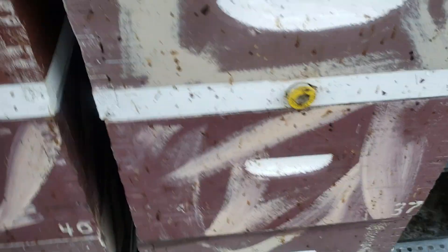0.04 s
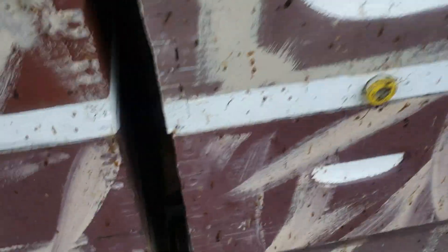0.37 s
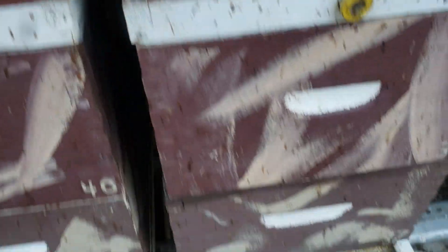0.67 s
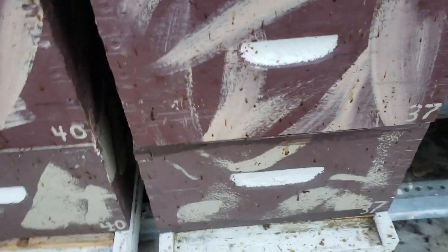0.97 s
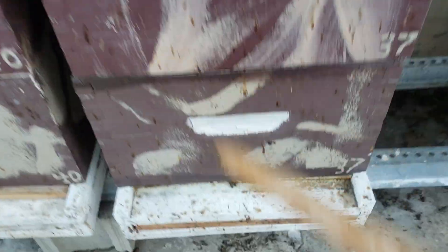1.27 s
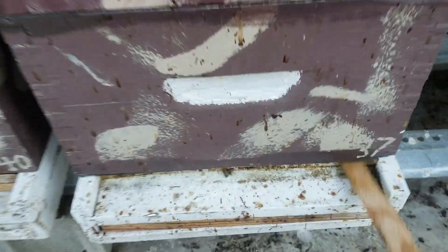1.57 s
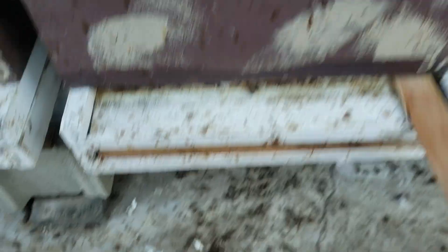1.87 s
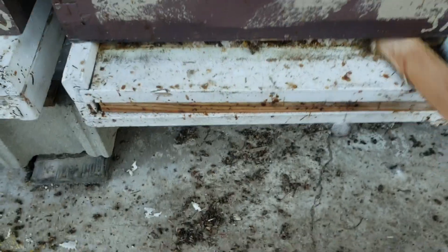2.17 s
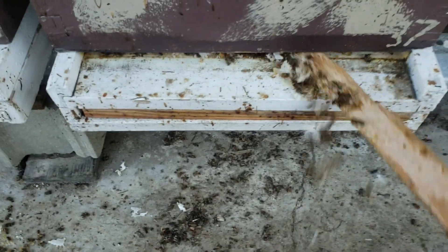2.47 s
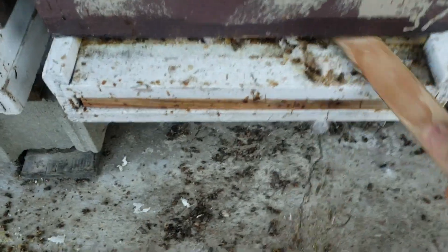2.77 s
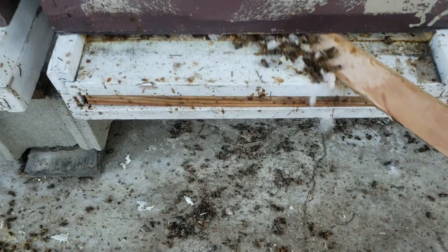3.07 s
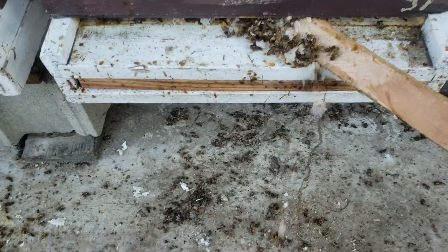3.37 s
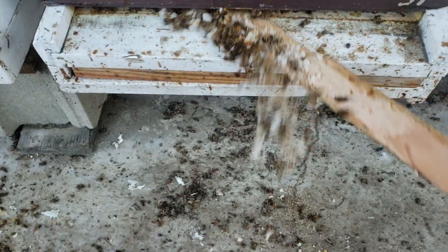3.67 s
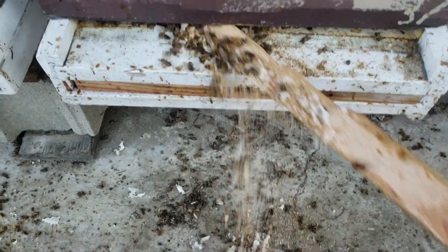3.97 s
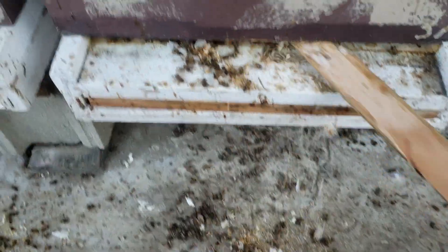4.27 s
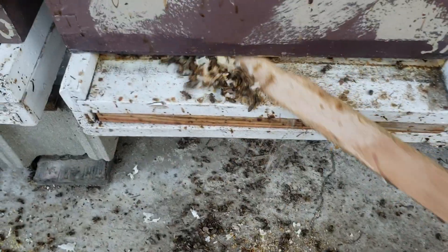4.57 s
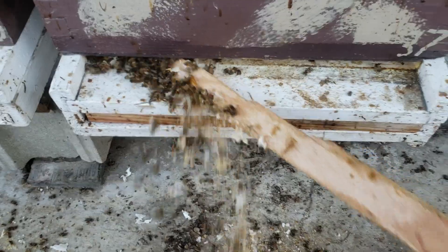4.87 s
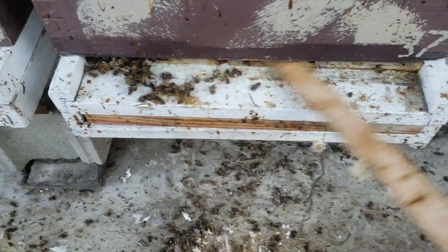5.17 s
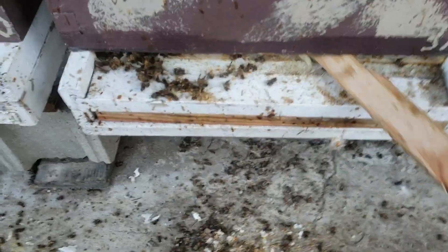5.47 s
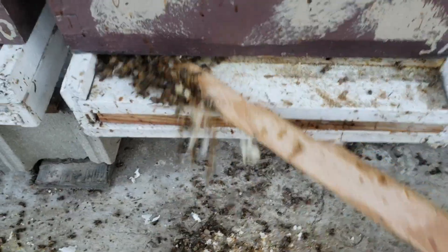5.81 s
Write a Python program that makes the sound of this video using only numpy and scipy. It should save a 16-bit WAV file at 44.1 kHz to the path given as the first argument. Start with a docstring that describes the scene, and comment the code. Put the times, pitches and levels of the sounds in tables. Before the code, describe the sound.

After a few gritty steps, a stick knocks and repeatedly scrapes a wooden hive board outdoors, crunching dry crumbs that patter down.

```python
"""Against a quiet outdoor background, someone steps up to a beehive over gritty concrete.
At 1.5 seconds a wooden stick taps the bottom board, then scrapes dry debris off it until the end.
The dragging tip crushes crumbs in a dense crackle and shakes the board, which rings with low wooden
tones. From 3.7 seconds on, loose crumbs patter down. A handheld stereo microphone is close by."""
import sys
import numpy as np
from scipy import signal
from scipy.fft import rfft, irfft, next_fast_len
from scipy.io import wavfile
from scipy.ndimage import uniform_filter1d, map_coordinates

SR = 44100
rng = np.random.default_rng(int(sys.argv[2]) if len(sys.argv) > 2 else 0)


def persist_wave(psi):
    """Save psi, clipped to +-1, as 16-bit WAV."""
    counts = np.round(np.clip(psi, -1, 1) * 32767).astype(np.int16)
    wavfile.write(sys.argv[1], SR, np.atleast_2d(counts).T)


N = 266540

# Tone colours. Each row: frequency in Hz, level there in dB.
AIR_TONE = [(15, -16), (25, -8.5), (149, -4), (190, -7.5), (344, -8.5), (734, -7.5), (1400, -26),
            (3430, -21.5), (16000, -31)]
GRIT_TONE = [(1000, -18), (2500, -13.5), (3300, 0), (4700, 1.5), (6000, -5), (7200, -8), (8300, -22.5),
             (12000, -10), (16000, -14)]
SOLE_TONE = [(300, -21.5), (700, -8.5), (1300, -3), (2200, 1), (3100, 2.5), (4300, 2), (8000, -31.5)]
THUD_TONE = [(30, -29), (65, -3), (100, 2.5), (150, -4), (220, -6), (400, -9.5), (750, -24), (1300, -13.5),
             (4000, -65)]
PATTER_TONE = [(500, -20), (1800, -3), (4000, -11), (6500, 1), (8300, -15), (12000, 1), (16000, 1)]
CLICK_TONE = [(500, -38), (1500, -18), (3300, 3), (6000, -4.5), (8300, -14.5), (12500, -2), (16000, 0)]  # dry wood on wood
HIVE_TONE = [(30, -53), (70, -20), (96, 4), (132, -10), (205, -2.5), (250, -0.5), (310, 0), (350, 0),
             (396, 5), (460, -4.5), (900, -34)]  # the deep box, strongest near 96 and 396 Hz
DUST_TONE = [(5000, -31), (8300, -17.5), (10200, -4), (12200, -2.5), (15800, -3.5)]
CRUMB_TONE = [(300, -24.5), (1000, -2), (2200, -1.5), (3000, 5), (4700, 6.5), (5500, 3.5), (6900, 5),
              (8200, -11.5), (10000, -36), (16000, -46)]
# Modes, the tones at which a thing rings. Each row: pitch in Hz, width in Hz, level in dB.
STICK_MODES = [(2660, 570, -7), (3580, 340, 3), (5670, 190, 9.5), (6350, 210, 5), (7040, 390, 2),
               (9270, 720, -2.5), (12800, 2600, -7.5)]
BOARD_MODES = [(552.4, 36.6, 0.5), (680, 39, -2.5), (766, 74, 0), (1083, 370, -9.5), (1454, 200, -5.5),
               (1693, 89, -2), (2570, 620, -8.5)]
LIP_MODES = [(2960, 94, -4), (3410, 210, -8), (3623, 26, -2), (4370, 100, -13), (4743, 150, -5),
             (5520, 210, -6)]  # the board's thin front edge
# The yard's echo. Each row: frequency in Hz, seconds to fade by 60 dB.
YARD_DECAY = [(100, 0.15), (1000, 0.048), (15000, 0.073)]
# Stereo width. Each row: frequency in Hz, gain in dB of what differs between the sides.
STEREO_WIDTH = [(40, 1), (100, -13), (450, -8), (800, -5), (1100, 1.5), (4000, -0.5), (8500, 1)]
# Stereo balance. Each row: frequency in Hz, gain of left over right in dB.
LEFT_LEAN = [(60, 1), (300, 1.7), (1000, 3), (3000, 4.6), (4600, 4.4), (6300, .5), (7700, 3), (10500, 2.6),
             (13000, -.5)]
# Soles scuffing. Each row: start, length and rise time in seconds, then grit, sole and weight in dB.
SCUFFS = [(0.201, 0.06, .003, -47.5, -63, -49), (0.489, 0.077, 0.015, -43.5, -48.5, -47.5),
          (0.596, 0.91, 0.017, -56.5, -59, -66), (0.685, .055, 0.025, -45.5, -52, -58),
          (1.026, 0.043, 0.042, -33, -45, -90), (1.11, 0.038, 0.012, -52, -54, -81),
          (1.254, 0.072, 0.0074, -45, -34.5, -65)]
# Heels landing. Each row: start in seconds, level in dB, hollow clop and thud in dB relative to that,
# base fade time in seconds.
HEELS = [(0.0166, -21.5, -8, -12, 0.12), (0.203, -47, -29, -12, 0.055), (0.5018, -34.5, -15.5, -25, 0.098),
         (0.7331, -26.5, -15, -11.5, 0.029), (0.8063, -18.5, -15.5, -12.5, 0.061)]
# Crumbs spilling. Each row: start in seconds, length in seconds, level in dB.
SPILLS = [(3.727, 0.365, -48), (4.5, 0.527, -46), (5.02, 0.25, -51.5)]
# Squeaks and groans. Each row: loudest moment in seconds, level in dB, pitch in Hz, half length in seconds.
SQUEAKS = [(0.264, -47.5, 5320, 0.024), (0.929, -51.5, 3500, 0.014), (1.075, -28.5, 3560, 0.0094),
           (1.076, -29, 4660, 0.0049), (1.283, -39.5, 2970, 0.03), (1.94, -29.5, 4700, 0.02),
           (2.796, -28, 5900, 0.0083), (2.868, -25, 4050, 0.0074), (2.887, -44, 97.5, 0.024),
           (2.885, -31.5, 265, 0.0085), (4.555, -35, 225, 0.0065), (3.982, -37.5, 545, 0.024),
           (4.38, -30, 560, 0.008), (5.114, -46.5, 1640, 0.039), (5.605, -43.5, 1610, 0.018),
           (5.719, -46, 2930, 0.014), (5.769, -26.5, 4710, 0.031)]
# Crumbs snapping and the stick's tip striking. Each row: start in seconds, peak level in dB.
SNAPS = [(1.651, -15.5), (1.7377, -25), (1.7485, -15.5), (1.777, -21.5), (2.658, -21), (2.788, -24),
         (3.0344, -21.5), (3.3059, -26), (3.361, -28.5), (3.776, -24), (3.826, -17), (4.7733, -14.5),
         (4.783, -25.5), (4.987, -18), (5.173, -28), (5.241, -32), (5.681, -17.5), (5.7735, -18.5),
         (5.796, -18)]
TAPS = [(1.5182, -9)]
# The stick knocking. Each row: start in seconds, board peak in dB, click and thump in dB relative to that.
KNOCKS = [(1.516, -31, 4, -7), (2.874, -28, -1, -2), (3.944, -22.5, 7, -30), (3.9635, -23.5, 9.5, -12.5),
          (4.132, -48, 18, -17), (4.275, -24, 2, -8), (4.377, -27, -11, 0), (4.456, -25.5, -2, -12),
          (4.495, -26, 10, -14), (5.071, -41, 10.5, -25), (5.261, -38, 15.5, -6), (5.652, -27.5, -17, -13)]
# Pushes and pulls of the stick. Each row: start, length, rise time and time to the crest in seconds,
# fall on either side of the crest in dB per second, crest levels of crumb crackle, board rattle,
# dust hiss and hive box judder in dB, rasp pitch in Hz.
STROKES = [ (1.522, 0.29, 0.029, 0.15, 50, -39.5, -62, -38.5, -58, 5130),
           (1.628, 0.38, 0.032, 0.27, 24, -36, -44.5, -46, -49, 4900),
           (2.046, 0.49, 0.033, 0.29, 35.5, -32, -40.5, -39, -43, 4300),
           (2.583, 0.28, 0.034, 0.29, 47, -27.5, -34.5, -34.5, -38.5, 5300),
           (2.882, 0.5, 0.035, 0.051, 33, -34, -39, -39.5, -41.5, 4000),
           (3.442, 0.45, 0.13, 0.17, 37.5, -32, -39.5, -40, -45, 4470),
           (3.916, 0.17, 0.019, 0.042, 92, -40, -39.5, -43.5, -49, 3750),
           (4.105, 0.3, 0.042, 0.071, 13, -37, -41, -43, -47, 4260),
           (4.43, 0.56, 0.021, 0.072, 26.5, -33, -39.5, -41, -43, 4040),
           (4.742, 0.039, .02, 0.028, 60, -32.5, -51, -43, -45, 4370),
           (4.939, 0.032, 0.041, .03, 63, -32, -40, -35, -47, 3580),
           (5.059, 0.096, 0.015, 0.034, 17, -45, -50, -43.5, -59, 4920),
           (5.225, 0.41, 0.034, 0.26, 66.5, -36, -37.5, -38.5, -44, 4040),
           (5.543, 0.056, 0.036, 0.035, 63, -28, -31.5, -35, -33.5, 4900),
           (5.654, .14, 0.046, 0.058, 34, -27, -40.5, -35, -46, 4460),
           (5.793, 0.25, 0.018, 0.022, 47, -36.5, -51, -40.5, -50, 5000), ]

SCUFF_RELEASE_S, STROKE_RELEASE_S = 0.081, 0.2  # time to fade by 60 dB
SPILL_ATTACK_S, SPILL_RELEASE_S = 0.12, 0.13
SHELL_HZ, SHELL_SPREAD_OCTAVES = 4940, 0.3  # the ring of a crumb's shell
DUST_EASING = 0.95  # share of a stroke's fall that the hiss follows: a light touch is hissier
TOP_HZ = 15850


def amp(db):
    """Turn decibels into a gain."""
    return 10 ** (np.asarray(db) / 20)


def unit(x):
    """Scale a stereo sound so that the mean of its two sides has an average (rms) level of 1."""
    return x / np.sqrt(np.mean(x.mean(0) ** 2) + 1e-20)


def peaked(x):
    """Scale a stereo hit so that the mean of its two sides peaks at 1."""
    return x / np.abs(x.mean(0)).max()


def along(points, hz):
    """Read between (Hz, value) points on a logarithmic frequency scale."""
    freqs, values = np.transpose(points)
    return np.interp(np.log(hz + 1), np.log(freqs), values)


def filtered(x, response):
    """Filter x with a function that gives the gain at each frequency."""
    n = x.shape[-1]
    padded = 2 * next_fast_len(n // 2 + 4096)
    return irfft(rfft(x, padded) * response(np.fft.rfftfreq(padded, 1 / SR)), padded)[..., :n]


def colour(points):
    """A filter with the given tone colour that rings after a hit, never before it."""
    def response(hz):
        cepstrum = irfft(np.log(amp(along(points, hz))))
        cepstrum[1:len(hz) - 1] *= 2
        cepstrum[len(hz):] = 0
        return np.exp(rfft(cepstrum))
    return response


def body(modes):
    """A filter that rings like an object with these modes."""
    return lambda f: sum((-1) ** k * amp(db) * 1j * f * width / (hz * hz - f * f + 1j * f * width)
                         for k, (hz, width, db) in enumerate(modes))


def burst(t60, size=8192):
    """One contact: a puff of stereo noise that fades by 60 dB in t60 seconds."""
    return rng.standard_normal((2, size)) * amp(-60 * np.arange(size) / SR / t60)


def add(track, start, sound):
    """Mix a sound into the track at start seconds."""
    part = track[:, max(round(start * SR), 0):][:, :sound.shape[1]]
    part += sound[:, :part.shape[1]]


def wobble(rate):
    """A smooth curve through rate random values a second."""
    return map_coordinates(rng.standard_normal(int(N * rate / SR) + 4), [np.arange(N) * rate / SR])


def steady(x, size=1800):
    """Even out slow swells and keep the fine grain."""
    power = np.mean(np.atleast_2d(x) ** 2, 0)
    return x / np.sqrt(np.abs(uniform_filter1d(uniform_filter1d(power, size), size)) + 1e-12)


def slide(start, length, attack, release, step=1):
    """Gain of one sliding contact, every step samples: it bites, holds and lets go."""
    t = np.arange(0, N, step) / SR - start
    return np.clip(t / attack, 0, 1) ** 2 * amp(-60 * np.clip((t - length) / release, 0, 2))


def slips(rate, spread_db, clump_db, clump_rate):
    """Surfaces stick and slip: about rate tiny kicks a second, uneven in size and swelling in clumps."""
    sizes = amp(spread_db * np.clip(rng.standard_normal(N), -3, 2.6) + clump_db * wobble(clump_rate))
    return steady((rng.random(N) < rate / SR) * sizes)


def scatter(pulses, t60, shared=0.62):
    """Each kick dies as a tiny puff; part of it reaches both sides, by paths of different length."""
    puff = amp(-60 * np.arange(2048) / SR / t60)
    level = np.sqrt(np.abs(signal.oaconvolve(pulses ** 2, puff ** 2)[:N]))
    left, right_only = rng.standard_normal((2, N))
    phases = np.append(0, rng.normal(0, 2.61, size=23))  # the bass arrives in step
    phase_hz = np.linspace(0, SR / 2, len(phases))
    shifted = filtered(left, lambda hz: np.exp(1j * np.interp(hz, phase_hz, phases)))
    right = shared * shifted + np.sqrt(1 - shared ** 2) * right_only
    return level * np.array([left, right])


def air():
    """Quiet outdoor background that drifts a little in level."""
    return amp(-59.0 + 0.25 * wobble(3.0)) * unit(filtered(rng.standard_normal((2, N)), colour(AIR_TONE)))


def yard_echo(x):
    """Sound bounces briefly off the hives and the concrete."""
    hz, t, spectrum = signal.stft(rng.standard_normal((2, SR // 3)), SR, nperseg=256)
    fade = amp(-60 * t / along(YARD_DECAY, hz)[:, None])
    tail = signal.istft(spectrum * fade, SR, nperseg=256)[1]
    return signal.fftconvolve(x, tail / np.linalg.norm(tail[0]), axes=1)[:, :N]


def footsteps():
    """Soles roll and scuff over the grit; heels land on concrete."""
    grit, sole, weight = sum(np.outer(amp(levels_db), slide(start, length, attack, SCUFF_RELEASE_S))
                             for start, length, attack, *levels_db in SCUFFS)
    sand = scatter(slips(rate=4100, spread_db=4.0, clump_db=2.5, clump_rate=97), t60=0.015)
    out = grit * unit(filtered(sand, colour(GRIT_TONE)))
    out += sole * unit(filtered(sand, colour(SOLE_TONE)))
    out += weight * unit(steady(filtered(sand, colour(THUD_TONE))))
    for start, db, clop_db, thud_db, fade in HEELS:
        crunch = peaked(filtered(burst(fade * 0.58), colour(GRIT_TONE)))
        slap = peaked(filtered(burst(fade * 1.63), colour(SOLE_TONE)))
        clop = peaked(filtered(burst(fade * 2.8), body([(498, 145, 0), (820, 230, 0)])))
        thud = peaked(filtered(burst(fade * 2.95), colour(THUD_TONE)))
        add(out, start, amp(db) * (crunch + amp(-3) * slap + amp(clop_db) * clop + amp(thud_db) * thud))
    return out


def spills():
    """Loosened crumbs drop off the edge and patter on the concrete."""
    flow = sum(amp(db) * slide(start, length, SPILL_ATTACK_S, SPILL_RELEASE_S)
               for start, length, db in SPILLS)
    landings = scatter(slips(rate=980, spread_db=8.0, clump_db=9, clump_rate=68), t60=0.011)
    return flow * unit(filtered(landings, colour(PATTER_TONE)))


def squeaks():
    """A sliding contact chatters for a moment around one pitch."""
    out, t = np.zeros((2, N)), np.arange(-SR // 8, SR // 8) / SR
    for crest, db, hz, half_length in SQUEAKS:
        swell = np.exp(-(t / half_length) ** 2)
        mode = body([(hz, 50 + .11 * hz, 0)])
        ring = swell * filtered(rng.standard_normal((2, len(t))), lambda f: mode(f) ** 2)
        add(out, crest + t[0], amp(db) * unit(ring) * np.sqrt(np.mean(swell ** 2)))
    return out


def snaps():
    """Larger crumbs crack, and each one's shell rings at its own pitch."""
    out = np.zeros((2, N))
    for start, db in SNAPS:
        hz = SHELL_HZ * 2 ** rng.normal(0, SHELL_SPREAD_OCTAVES)
        crack = burst(t60=.012) + amp(-14) * burst(t60=.035)
        shell = [(hz * 0.63, 1000, -4), (hz, 1300, 0), (12500, 5000, -15)]
        add(out, start, amp(db) * peaked(filtered(crack, body(shell))))
    return out


def taps():
    """The hard tip meets the board and the stick rings for an instant."""
    out = np.zeros((2, N))
    for start, db in TAPS:
        blow = burst(t60=0.0064) + amp(-10) * burst(t60=0.014)
        add(out, start, amp(db) * peaked(filtered(blow, body(STICK_MODES))))
    return out


def knocks():
    """The stick catches, clicks and sets the board ringing; a blunt blow also thumps the hive box."""
    out = np.zeros((2, N))
    for start, db, click_db, thump_db in KNOCKS:
        blow = amp(-20.5) * burst(t60=0.09)
        blow[:, 0] += 1  # the sharp first contact
        ring = peaked(filtered(blow, lambda f: body(BOARD_MODES)(f) / (1 + 1j * f / 1100)))
        click = peaked(filtered(burst(t60=.008) + amp(-12) * burst(t60=.04), colour(CLICK_TONE)))
        thump = peaked(filtered(burst(t60=0.084), colour(HIVE_TONE)))
        add(out, start, amp(db) * (ring + amp(click_db) * click + amp(thump_db) * thump))
    return out


def strokes(step=16):
    """Each stroke builds and eases off. Gives crackle, rattle, hiss and judder gains and rasp pitch."""
    t, table = np.arange(0, N, step) / SR, np.array(STROKES)
    touch = np.array([slide(*timing, STROKE_RELEASE_S, step) for timing in table[:, :3]])
    eased_db = np.array([-fall * np.abs(t - start - crest) for start, _, _, crest, fall in table[:, :5]])
    effort = (touch * amp(eased_db)) ** 2
    brush = (touch * amp(DUST_EASING * eased_db)) ** 2
    crackle, rattle, hiss, judder = amp(table[:, 5:9].T) ** 2
    gains = np.sqrt([crackle @ effort, rattle @ effort, hiss @ brush, judder @ effort])
    pitch_hz = table[:, 9] @ effort / (effort.sum(0) + 1e-20)
    return [np.interp(np.arange(N) / SR, t, control) for control in (*gains, pitch_hz)]


def rasp(x, pitch_hz, boost_db, octaves, patchy_db):
    """A boosted band follows the tip's grip; each patch of debris shades the sound differently."""
    hz, t, spectrum = signal.stft(x, SR, nperseg=512)
    centre = np.interp(t, np.arange(N) / SR, np.clip(pitch_hz, 2500, 7000))
    band = np.exp(-(np.log2((hz[:, None] + 1) / centre) / octaves) ** 2)
    patches = uniform_filter1d(rng.standard_normal(spectrum.shape[1:]), size=5, axis=0)
    patches = uniform_filter1d(patches, size=12, axis=1)
    gain = amp(boost_db * band + patchy_db * patches / patches.std())
    return signal.istft(spectrum * gain, SR, nperseg=512)[1][:, :N]


def scraping():
    """The tip's slips crush the crumbs, raise a hiss of dust, rattle the board and shake the hive box."""
    crackle, rattle, hiss, judder, pitch_hz = strokes()
    pulses = slips(rate=2200, spread_db=1.5, clump_db=2.1, clump_rate=100)
    crush, rub, dust, shake = (scatter(pulses, t60=.008) for _ in range(4))
    crunch = unit(filtered(crush, colour(CRUMB_TONE)))
    lip_ring = amp(-5) * unit(filtered(rub, body(LIP_MODES)))
    grain = rasp(crunch + lip_ring, pitch_hz, boost_db=3.5, octaves=0.4, patchy_db=2.5)
    out = crackle * unit(steady(grain))
    out += hiss * unit(filtered(dust, colour(DUST_TONE)))
    out += rattle * unit(steady(filtered(shake, body(BOARD_MODES))))
    boom = unit(filtered(rub, lambda f: body([(98, 30, 0)])(f) ** 2))  # the box's lowest mode rings on
    out += judder * (unit(steady(filtered(shake, colour(HIVE_TONE)))) + amp(-10) * boom)
    return out * amp(1.1 * wobble(24))  # the debris resists unevenly


def scene():
    """All the sounds together in the open yard."""
    near = scraping() + spills() + squeaks() + snaps() + taps() + knocks() + footsteps()
    return near + amp(-5.5) * yard_echo(near) + air()


def record(dry):
    """A close stereo microphone: bass nearly mono, the left side louder, nothing above TOP_HZ."""
    mid = dry.mean(0)
    side = filtered(dry[0] - mid, lambda hz: amp(along(STEREO_WIDTH, hz)))
    pair = np.array([mid + side, mid - side])
    pair = filtered(pair, lambda hz: amp(np.outer([.5, -.5], along(LEFT_LEAN, hz))))
    return filtered(pair, lambda hz: hz < TOP_HZ)


dry = scene()
out = record(dry)
persist_wave(out)
```